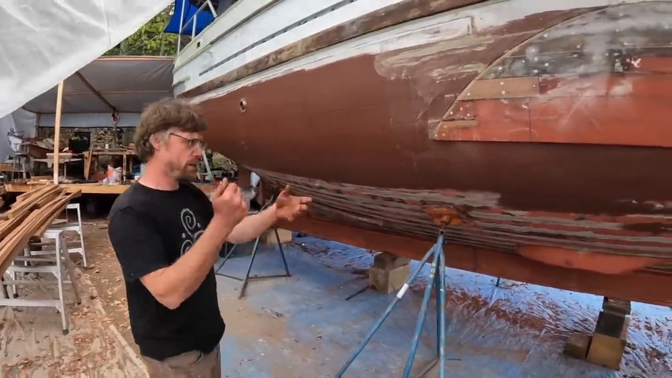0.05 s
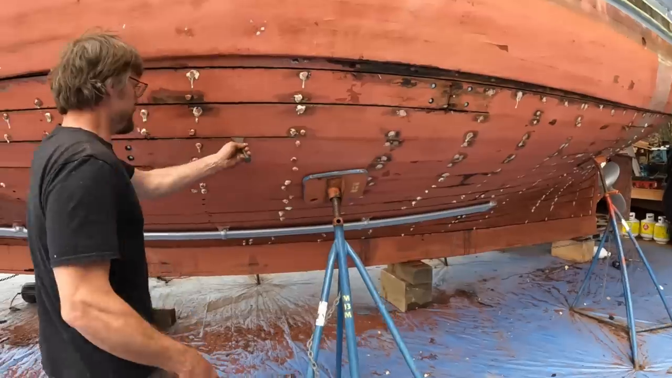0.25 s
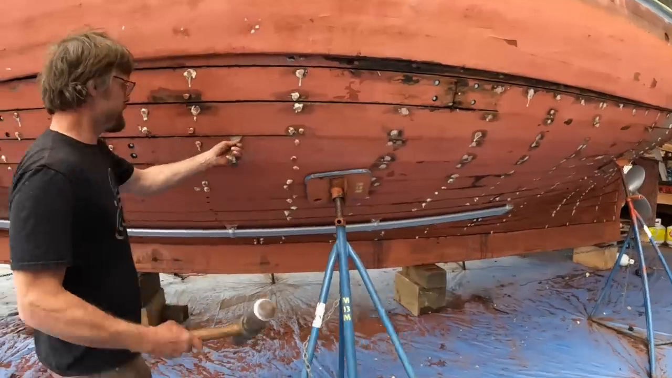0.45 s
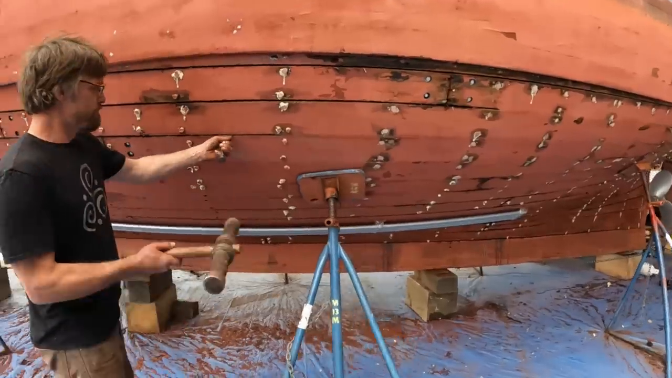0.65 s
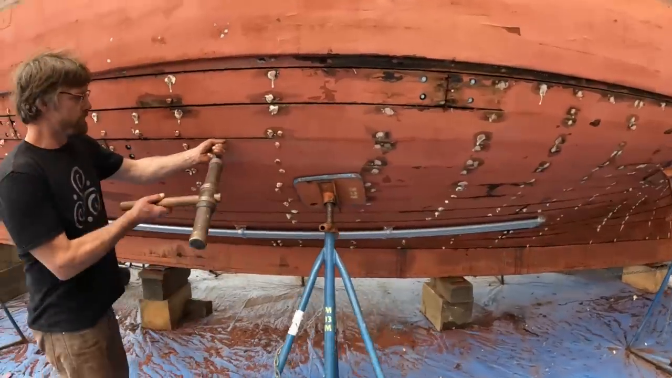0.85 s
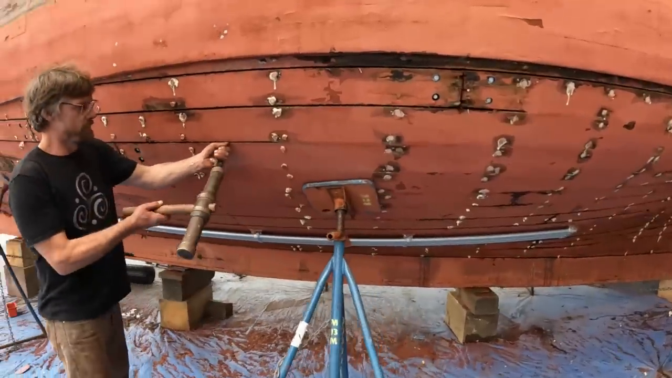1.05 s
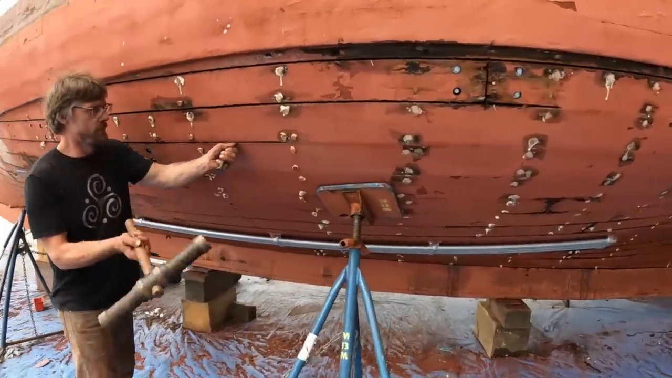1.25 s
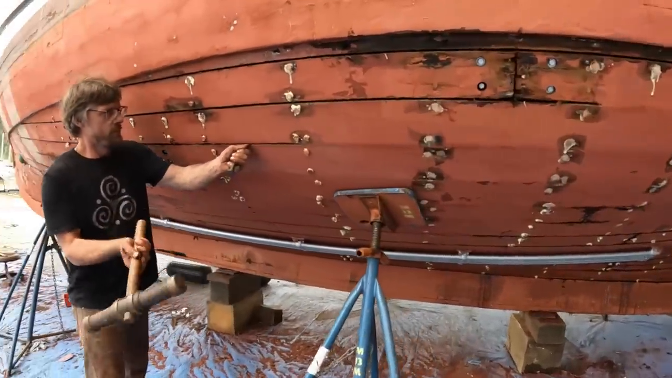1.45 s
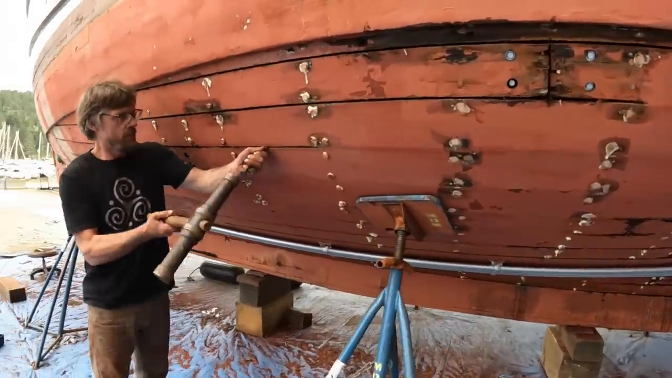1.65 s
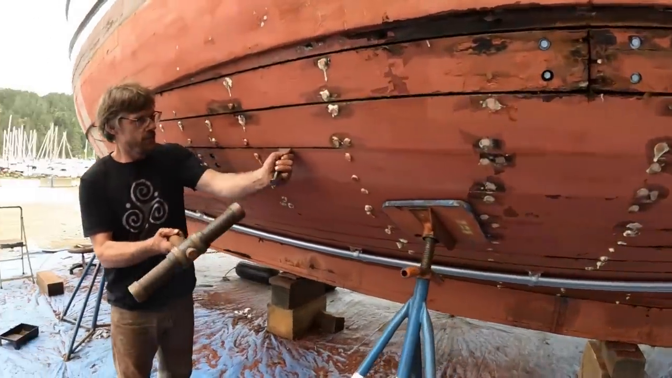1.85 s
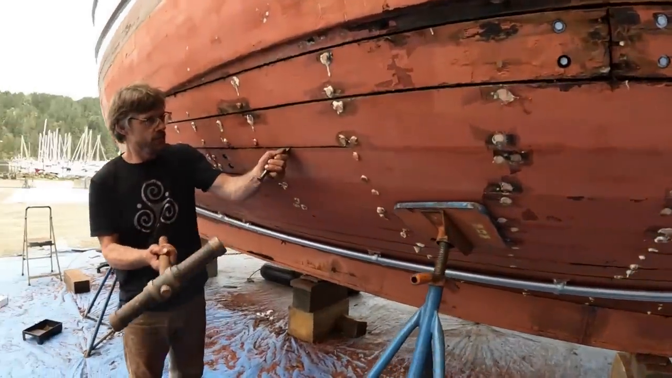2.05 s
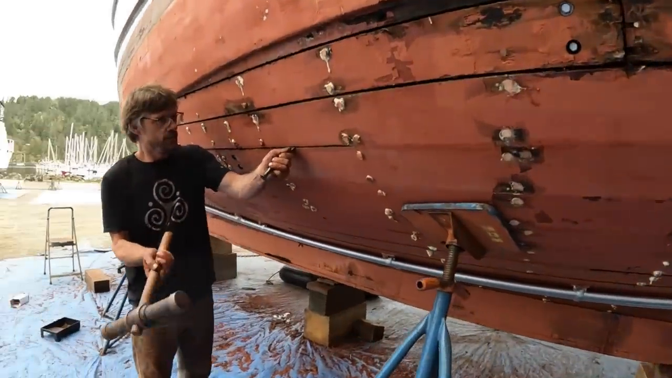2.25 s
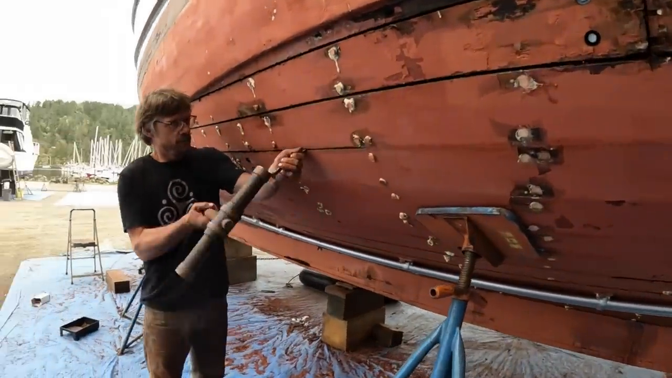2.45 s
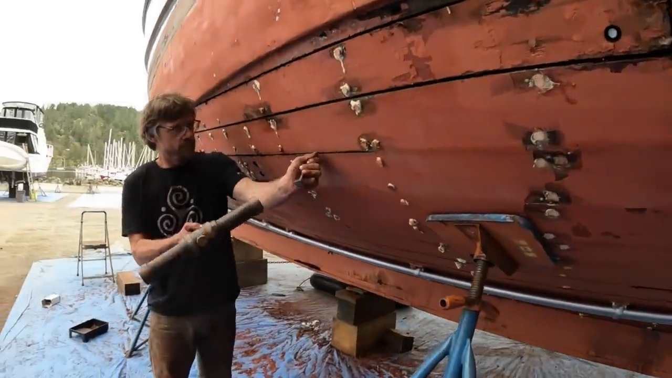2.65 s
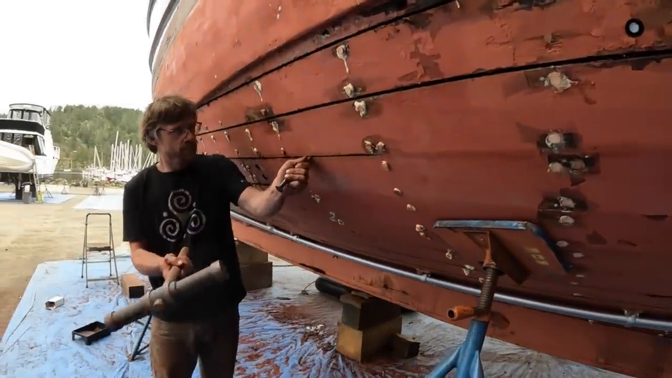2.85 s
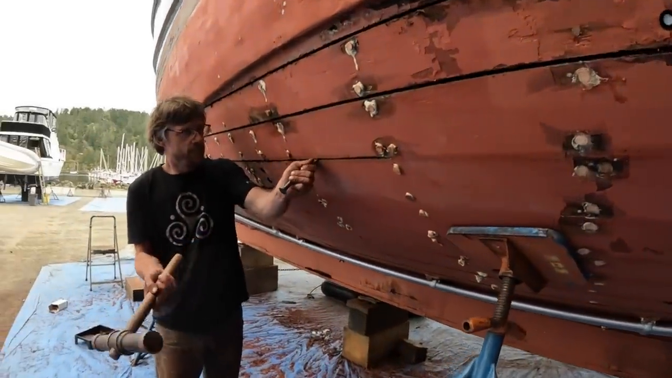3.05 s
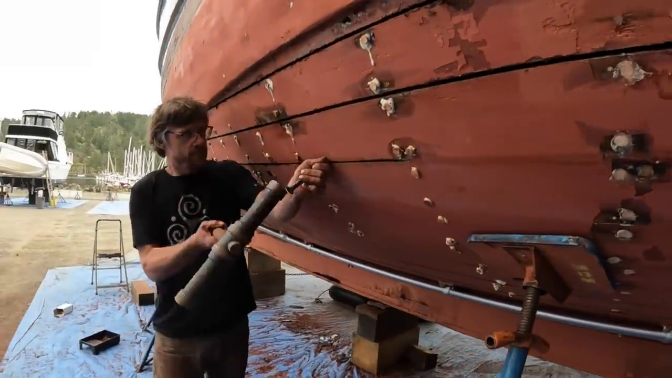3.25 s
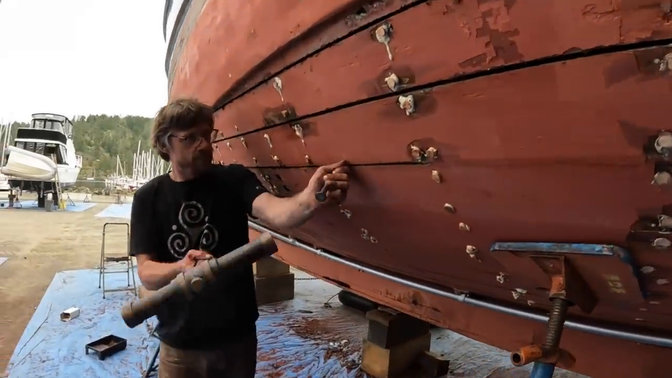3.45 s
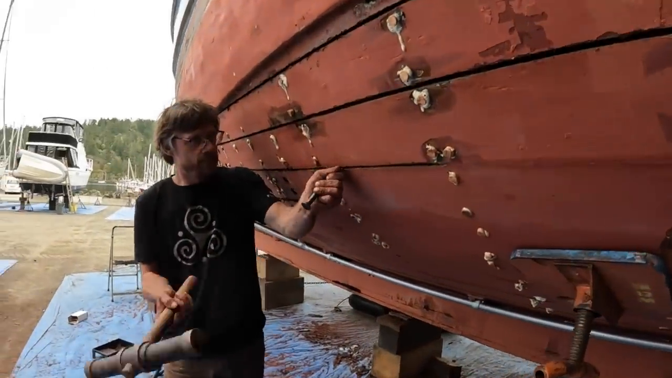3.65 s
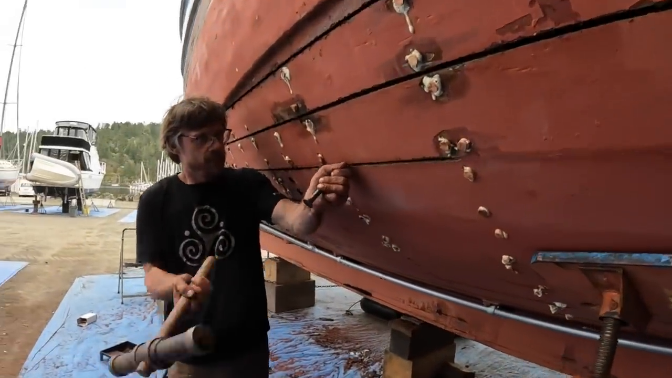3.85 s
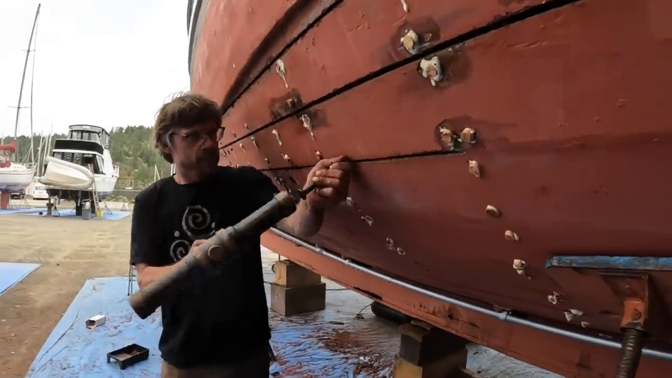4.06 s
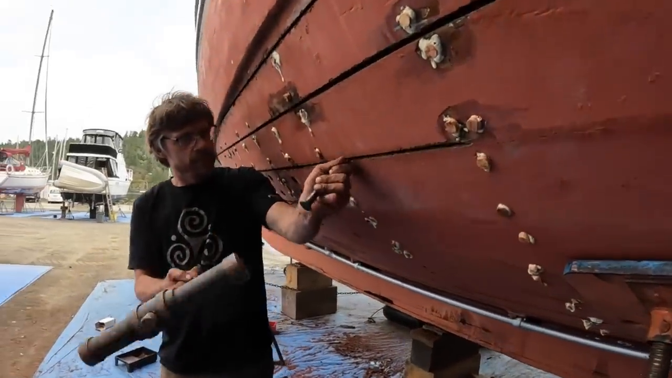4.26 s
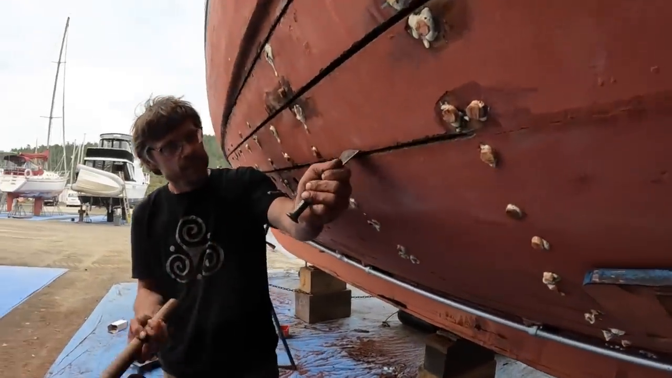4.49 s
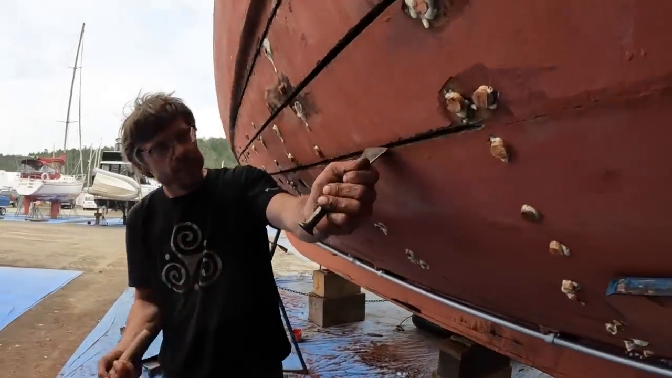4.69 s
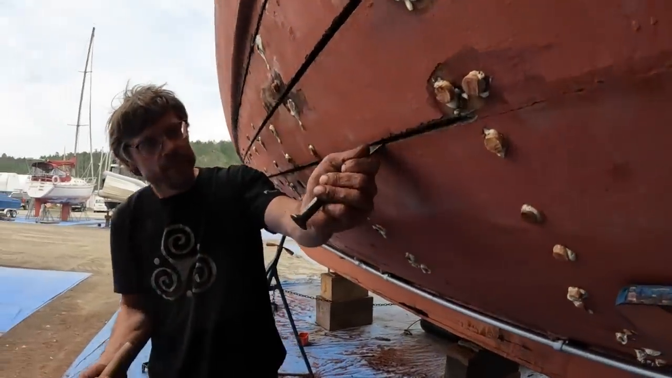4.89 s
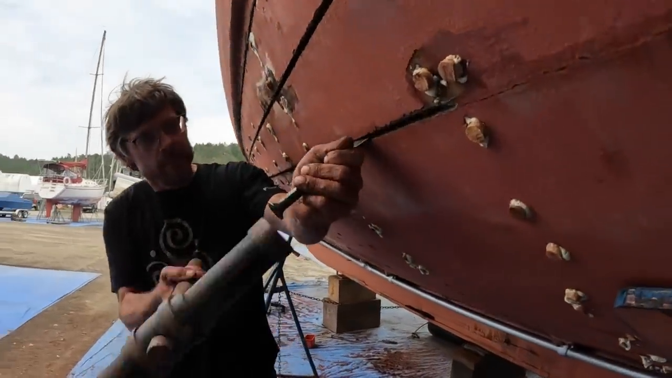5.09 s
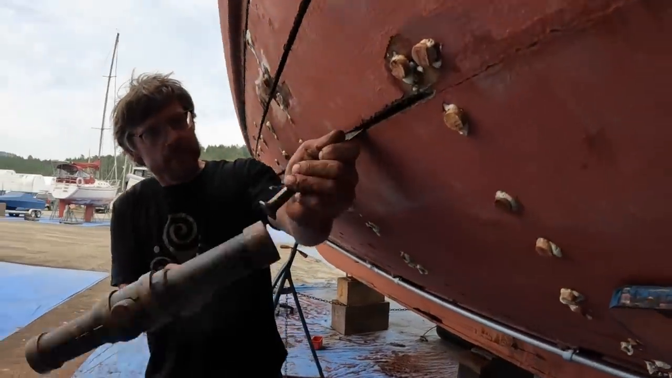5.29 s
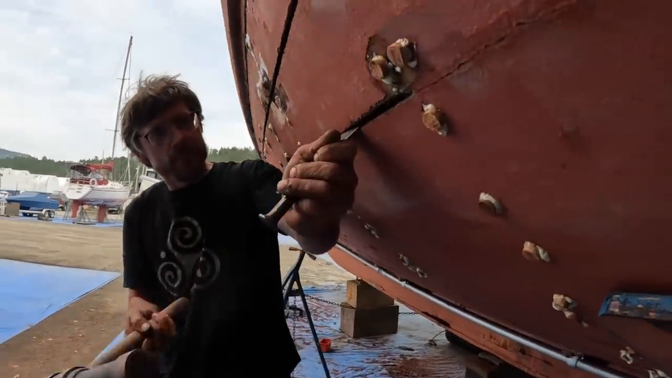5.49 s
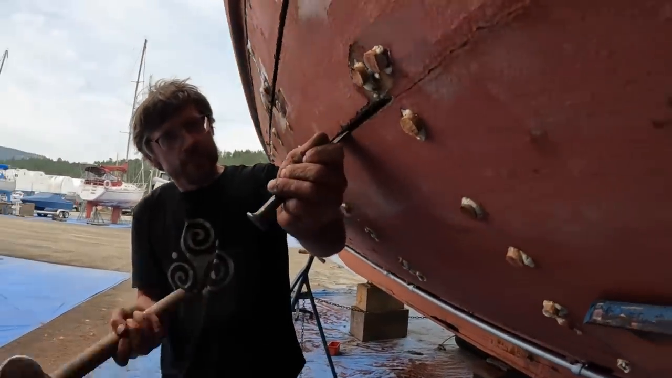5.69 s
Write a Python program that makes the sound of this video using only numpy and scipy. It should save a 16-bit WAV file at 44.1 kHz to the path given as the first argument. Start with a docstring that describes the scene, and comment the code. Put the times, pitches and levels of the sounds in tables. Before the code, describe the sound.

A wooden mallet strikes a metal caulking iron six times, sharp ringing knocks that thump through a hollow boat hull and echo outdoors.

```python
"""A wooden mallet drives a caulking iron into the plank seams of a propped-up hull, six blows close by.
Each blow cracks, rings in mallet and iron, knocks the plank, thumps in the hollow hull and comes back
from across the open boatyard. Feet scuff on a tarpaulin and the iron taps as it is reset.
A gust buffets the stereo microphone before the first blow; the yard hums in the distance throughout."""
import sys
import numpy as np
from scipy import signal
from scipy.fft import rfft, irfft, next_fast_len
from scipy.io import wavfile

SR = 44100
rng = np.random.default_rng(int(sys.argv[2]) if len(sys.argv) > 2 else 0)


def waveform_to_disk(signal):
    """Save audio, clipped to [-1, 1], as 16-bit WAV at the path in sys.argv[1]."""
    frames = np.transpose(np.atleast_2d(signal))
    scaled = np.clip(frames, -1, 1) * 32767
    samples = np.round(scaled).astype(np.int16)
    wavfile.write(sys.argv[1], SR, samples)


N = 252631
TIME_S = np.arange(N) / SR


def amp(db):
    """Decibels to gain."""
    return 10 ** (np.asarray(db) / 20)


def unit_rms(x):
    """Scale to rms 1."""
    return x / np.sqrt(np.mean(x ** 2) + 1e-20)


def stereo(mid, side, side_db):
    """Left and right channels from mid and side."""
    return mid + amp(side_db) * side * np.array([[1], [-1]])


def filtered(x, order, hz, kind):
    """Butterworth filter."""
    return signal.sosfilt(signal.butter(order, hz, kind, fs=SR, output="sos"), x)


def drift(rate_hz):
    """A smooth random wander of rms 1."""
    hop = 40
    pole = np.exp(-2 * np.pi * rate_hz * hop / SR)
    noise = rng.standard_normal(N // hop + 2002)
    slow = signal.lfilter([1], [1, -2 * pole, pole * pole], noise)[2000:]
    return np.interp(np.arange(N) / hop, np.arange(len(slow)), unit_rms(slow))


def coloured_noise(spectrum, side_db, grain=1):
    """Stereo noise of a given spectrum, rms 1; grain is a gain applied before the colour."""
    hz, db = np.transpose(spectrum)
    size = next_fast_len(N)
    bin_hz = np.arange(size // 2 + 1) * SR / size
    colour = amp(np.interp(np.log(bin_hz + 1), np.log(hz), db))
    noise = rng.standard_normal((2, N)) * grain
    mid, side = irfft(rfft(noise, size) * colour, size)[:, :N]
    return unit_rms(stereo(mid, side, side_db))


def clicks(start_s, level_db):
    """Single-sample clicks at the given times."""
    train = np.zeros(N)
    train[np.round(np.asarray(start_s) * SR).astype(int)] = amp(level_db)
    return train


def ring(force, hz, t60_s):
    """One mode: a unit click starts a decaying sine of height 1."""
    pole, step = amp(-60 / (t60_s * SR)), 2 * np.pi * hz / SR
    return signal.lfilter([0, np.sin(step)], [1, -2 * pole * np.cos(step), pole * pole], force + 1e-18)


def struck(modes, start_s, level_db, scatter_db, force=(1,)):
    """A force, given sample by sample, drives each mode with a slightly random strength."""
    at, push, sound = round(start_s * SR), np.zeros(SR // 2), np.zeros(N)
    push[:len(force)] = force
    drive_db = level_db + scatter_db * rng.standard_normal(len(modes))
    body = sum(ring(push * amp(drive + db), hz, t60) for drive, (hz, db, t60) in zip(drive_db, modes))
    sound[at:at + len(body)] = body[:N - at]
    return sound


def noise_bursts(start_s, level_db, band_hz, t60_s):
    """Band noise that starts sharply at each time and dies away."""
    decay = signal.lfilter([1], [1, -amp(-60 / (t60_s * SR))], clicks(start_s, level_db) + 1e-18)
    return filtered(decay * rng.standard_normal(N), 4, band_hz, "band")


# Colour of the distant yard: frequency_hz, density_db
HUM_SPECTRUM = [(12, -1.5), (25, 3.5), (74, 6), (150, -1.5), (280, -8.5), (450, -17), (860, -17.5),
                (1500, -26), (2400, -29), (3800, -30), (5500, -49), (7300, -52.5), (8500, -89.5),
                (15500, -48)]
# Its rise and fall: time_s, level_db
HUM_LEVELS = [(0.0, -43.5), (0.43, -35), (0.8, -41.5), (1.85, -44.5), (2.1, -46.5), (2.5, -48.5),
              (2.7, -45), (3.41, -38.5), (3.78, -44.5), (4.15, -40.5), (4.53, -43), (5.33, -38),
              (5.73, -41)]


def yard_hum():
    """The yard in the distance: low noise near the centre, its level wandering."""
    time_s, level_db = np.transpose(HUM_LEVELS)
    gain = amp(np.interp(TIME_S, time_s, level_db) + 0.79 * drift(0.67))
    return gain * coloured_noise(HUM_SPECTRUM, side_db=-33.5)


# Feet on the tarpaulin (rise and fall span 20 dB): peak_s, rise_s, fall_s, bright_db, dull_db
SCUFFS = [(0.06, 0.0067, 0.13, -47.5, -45), (0.19, 0.089, 0.089, -40.5, -51),
          (0.34, 0.083, 0.097, -36, -56), (0.621, 1, 0.28, -46, -59.5), (0.85, 0.79, 0.9, -56, -72),
          (1.062, 0.084, 0.19, -68.5, -42), (1.388, 0.065, .17, -39, -35.5),
          (1.465, 0.012, .06, -49.5, -56), (2.041, 0.046, .03, -59, -50), (2.343, 0.16, 0.39, -59, -55.5),
          (2.948, 0.24, 0.36, -88, -56), (3.13, 0.089, 0.058, -68.5, -42.5),
          (3.26, 0.36, .05, -65.5, -50.5), (3.94, 0.3, 0.3, -62.5, -45), (4.642, 0.013, 0.13, -54, -61.5),
          (4.813, 0.0031, 0.015, -55, -35), (5.142, 1, 0.31, -53.5, -44), (5.356, 0.017, 0.021, -50, -67),
          (5.7, .6, 0.4, -56, -48.5)]
# Colours of a scuff's bright and dull parts: frequency_hz, density_db
BRIGHT_SPECTRUM = [(500, -47.5), (1000, 3.5), (2100, 2), (5200, 0.5), (7300, -5), (8200, -14),
                   (11000, -21.5), (12600, -20), (13600, -27.5), (15500, -45.5)]
DULL_SPECTRUM = [(120, -3), (300, 9), (700, 9.5), (1400, 3), (2200, -4), (3500, -42)]


def foot_scuffs():
    """Grit and tarpaulin folds underfoot: grainy noise that swells and fades with each scuff."""
    bright, dull = np.zeros((2, N))
    for peak_s, rise_s, fall_s, bright_db, dull_db in SCUFFS:
        swell = amp(-20 * np.maximum((peak_s - TIME_S) / rise_s, (TIME_S - peak_s) / fall_s))
        bright += amp(bright_db) * swell
        dull += amp(dull_db) * swell
    grit = coloured_noise(BRIGHT_SPECTRUM, side_db=-9, grain=amp(1.8 * drift(90) + 1.2 * drift(20)))
    folds = coloured_noise(DULL_SPECTRUM, side_db=-21.5, grain=amp(2.5 * drift(27)))
    return bright * grit + dull * folds


# Wind on the microphone: time_s, level_db
GUST_LEVELS = [(0.05, -57), (0.065, -37), (0.26, -52), (0.345, -32), (0.45, -40.5), (0.515, -20),
               (0.62, -9.5), (0.72, -23.5), (0.8, -19), (0.94, -44.5)]
# Colour of its buffeting: frequency_hz, density_db
GUST_SPECTRUM = [(12, -48), (20, -8), (45, 2.5), (70, 2.5), (157, -3.5), (191, -2.5), (306, -9.5),
                 (341, -15), (455, -15), (1500, -48), (1950, -57), (3300, -120)]


def wind_gust():
    """Lumpy turbulence right at the microphone, stronger in the right channel."""
    time_s, level_db = np.transpose(GUST_LEVELS)
    time_s = np.r_[time_s[0] - .03, time_s, time_s[-1] + .03, time_s[-1] + .06]
    level_db = np.r_[-90, level_db, level_db[-1], -90]   # fades in; holds a moment before fading out
    lumps = coloured_noise(GUST_SPECTRUM, side_db=-12, grain=amp(3 * drift(30)))
    return amp(np.interp(TIME_S, time_s, level_db)) * lumps * amp([[-3.5], [2.2]])


# The iron as it is handled, reset and bounces: start_s, level_db, pitch_hz
IRON_TICKS = [(0.058, -46, 3140), (0.375, -37, 1900), (0.394, -38, 8760), (0.541, -66, 9000),
              (1.061, -27, 1840), (4.643, -44, 2820), (4.695, -44, 4430), (4.813, -31.5, 3630),
              (5.088, -37.5, 4430), (5.233, -34, 6930), (3.175, -46.5, 3520), (5.296, -40, 4360),
              (5.352, -38, 2580)]


def iron_ticks():
    """Each light contact gives a dry snap and a short metallic ring."""
    ring_cycles = 81   # to die by 60 dB
    rings = sum(ring(clicks(s, db), hz, ring_cycles / hz) for s, db, hz in IRON_TICKS)
    start_s, level_db, _ = np.transpose(IRON_TICKS)
    return rings + noise_bursts(start_s, level_db + 1, band_hz=(2200, 6160), t60_s=0.004)


# Modes of the caulking iron: pitch_ratio, level_db, t60_s
IRON_MODES = [(0.789, -8, 0.069), (.89, -11, 0.035), (1.001, 3.5, 0.058), (1.18, -7.5, 0.035),
              (1.27, -6.5, .04), (1.428, -18.5, 0.037)]
# Modes of the mallet head: pitch_hz, level_db, t60_s
MALLET_MODES = [(1770, -18, 0.082), (2330, -28, 0.047), (4304, -12, 0.026), (5425, -19.5, .03),
                (5760, -23, 0.024), (6530, -19.5, 0.024), (7030, -17.5, 0.015)]


def tool_modes(pitch_hz, iron_db, head_db, tilt_db, falloff_db):
    """Iron and mallet ring together; the iron's pitch shifts with grip and depth in the seam."""
    modes = []
    for ratio, db, t60 in IRON_MODES:
        octaves = np.log2(ratio)
        modes.append((ratio * pitch_hz, db + iron_db + tilt_db * octaves - falloff_db * abs(octaves), t60))
    return modes + [(hz, db + head_db, t60) for hz, db, t60 in MALLET_MODES]


# Modes of the plank under the iron: pitch_hz, level_db, t60_s
PLANK_MODES = [(350, -8.5, 0.067), (540, -6, 0.0058), (727, 6.5, 0.0073), (1023, 4.5, 0.013),
               (1510, 2, 0.0081)]


def plank_knock(start_s, level_db, rasp, lead_s):
    """A faint, dull rasp swells just before the blow; then the plank knocks."""
    dull_rasp = struck(PLANK_MODES, start_s - lead_s, level_db - 41, scatter_db=0.63, force=rasp)
    return dull_rasp + struck(PLANK_MODES, start_s, level_db, scatter_db=1.5)


# Modes of the hollow hull: pitch_hz, level_db, t60_s
HULL_MODES = [(61.47, -12, 0.87), (91.6, -17.5, 0.33), (106, -7.5, 0.15), (125.1, 0.5, 0.14),
              (181, -32, 0.066), (224, -11, 0.088), (305, -14, 0.14)]


def hull_thump(start_s, level_db):
    """The planking is pushed in and springs back within 6 ms, setting the hull ringing."""
    shove = -np.sin(np.linspace(0, 2 * np.pi, round(.006 * SR)))
    return struck(HULL_MODES, start_s, level_db, scatter_db=.7, force=shove / np.abs(shove).sum())


def crack_treble(start_s, level_db):
    """The top of the crack and the shiver of the iron, different in each microphone channel."""
    mid, side = [noise_bursts(start_s, level_db, band_hz=(4300, 16000), t60_s=0.004)
                 + noise_bursts(start_s, level_db - 23.5, band_hz=(4500, 12000), t60_s=0.055)
                 for _ in range(2)]
    return stereo(mid, side, side_db=-3)


def echoes(sound, delay_s, rise_s, t60_s, side_db):
    """Scattered reflections reach the microphone after a gap, swell, then fade."""
    t = np.arange(SR) / SR
    swell = 1 - np.exp(-np.maximum(t - delay_s, 0) / rise_s)
    mid, side = rng.standard_normal((2, SR)) * swell * amp(-60 * t / t60_s)
    response = stereo(mid, side, side_db) / np.sqrt(np.sum(mid ** 2))
    return signal.fftconvolve(sound[None], response, axes=1)[:, :N]


def yard_echoes(near, far, hull):
    """Returns from the hull side and ground close by, then neighbouring sheds and the far yard."""
    far = filtered(far, 4, 5000, "low")   # distance dulls the return
    hull_side = amp(-28) * echoes(near, delay_s=0.00065, rise_s=0.00084, t60_s=0.024, side_db=9)
    ground = amp(12) * echoes(far, delay_s=0.00069, rise_s=0.00053, t60_s=0.067, side_db=-42.5)
    sheds = echoes(far, delay_s=0.026, rise_s=0.013, t60_s=0.75, side_db=-32.5)
    far_yard = amp(-16) * echoes(far, delay_s=0.13, rise_s=0.06, t60_s=1.1, side_db=-27)
    boom = amp(-11.5) * echoes(hull, delay_s=0.073, rise_s=0.0067, t60_s=0.45, side_db=-53)
    return hull_side + ground + sheds + far_yard + boom


# Blows close to the microphone, each level relative within its own layer: start_s, crack_db, hull_db,
# plank_db, treble_db, pitch_hz, tilt_db_per_octave, yard_db, lead_db, iron_db, head_db, hull_side_db,
# falloff_db_per_octave
BLOWS = [(0.9676, 3, -8, -31, -46, 3504, -9.5, -40, -54.5, -1, 4.5, 4, -17),
         (1.6364, 2, -3, -23.5, -39, 3245, 26.5, -42.5, -44, 7.8, -16, -32, 16),
         (2.502, 13, -4, -24.5, -21.5, 3290, -10.5, -29.5, -35, -7.5, 2.5, -43, 2),
         (3.2938, 5, -4, -15.5, -19.5, 3506, -11, -35.5, -37, 0.3, 5.5, -10.5, 20.5),
         (4.0174, 5, -6, -19.5, -18.5, 3566, 5, -40.5, -35, -0.7, 1, -1, 6.5),
         (5.1903, 10.5, -7.5, -11, -19, 3610, -2, -41.5, -38.5, -5, 6, 4, -2)]


def mallet_blows():
    """Mallet on iron: a brief rasp swells into the crack, and tool, plank, hull and yard answer."""
    tool, plank, hull, far = np.zeros((4, N))
    grip_t60_s = .026   # the hand damps the struck tool within this time
    far_t60_s = .013    # only the start of the ring is loud enough to come back from the yard
    lead_s = .038
    swell = np.linspace(0, 1, round(lead_s * SR)) ** 1.36
    for (start_s, crack_db, hull_db, plank_db, _, pitch_hz, tilt_db,
         yard_db, lead_db, iron_db, head_db, _, falloff_db) in BLOWS:
        modes = tool_modes(pitch_hz, iron_db, head_db, tilt_db, falloff_db)
        gripped = [(hz, db, min(t60, grip_t60_s)) for hz, db, t60 in modes]
        carried = [(hz, db, far_t60_s) for hz, db, _ in modes]
        rasp = swell * rng.standard_normal(len(swell))
        tool += struck(modes, start_s - lead_s, lead_db, scatter_db=4, force=rasp)
        tool += struck(gripped, start_s, crack_db - 16, scatter_db=1.5)
        plank += plank_knock(start_s, plank_db, rasp, lead_s)
        hull += hull_thump(start_s, hull_db)
        far += struck(carried, start_s, yard_db + 13, scatter_db=1.5)
    tool = filtered(tool, 6, 7500, "low")   # a wooden face puts little force above this
    hull = filtered(hull, 4, 52, "high")    # too small to radiate deep bass
    start_s, crack_db, _, _, treble_db, _, _, yard_db, _, _, _, hull_side_db, _ = np.transpose(BLOWS)
    crack = noise_bursts(start_s, crack_db - 2.5, band_hz=(2520, 4180), t60_s=0.016)
    far += filtered(clicks(start_s, yard_db + 20), 3, (2400, 4500), "band")   # returns as a pitchless wash
    direct = tool + crack + plank
    near = direct * amp(np.interp(TIME_S, start_s, hull_side_db))
    return direct + crack_treble(start_s, treble_db) + hull + yard_echoes(near, far, hull)


# Dull wooden knocks between the blows: start_s, level_db, pitch_hz
WOOD_KNOCKS = [(1.088, -18.5, 784), (1.377, -19.5, 305), (1.406, -21, 360), (1.435, -13, 765),
               (4.586, -27.5, 576), (4.815, -23, 614), (4.816, -29, 126), (4.947, -24.5, 129)]


def wood_knocks():
    """Knocked wood rings briefly at one pitch; lower knocks last more cycles."""
    knocks = np.zeros(N)
    for start_s, level_db, pitch_hz in WOOD_KNOCKS:
        ring_cycles = 7.3 * (pitch_hz / 500) ** -0.95
        knocks += ring(clicks(start_s, level_db), pitch_hz, t60_s=ring_cycles / pitch_hz)
    return knocks


def scene():
    """The boatyard as heard from beside the hull."""
    return yard_hum() + foot_scuffs() + wind_gust() + iron_ticks() + mallet_blows() + wood_knocks()


def record(dry):
    """The microphone chain rounds the peaks and cuts the highest treble."""
    ceiling, cutoff_hz = 1.12, 15700
    rounded = ceiling * np.tanh(dry / ceiling)
    return signal.sosfilt(signal.cheby2(12, 70, cutoff_hz, fs=SR, output="sos"), rounded)


dry = scene()
out = record(dry)
waveform_to_disk(out)
```